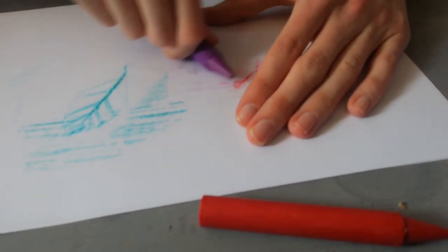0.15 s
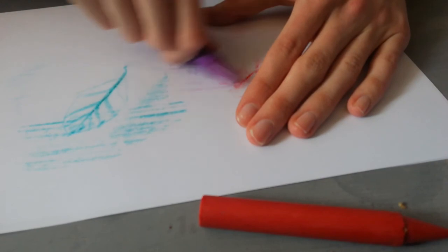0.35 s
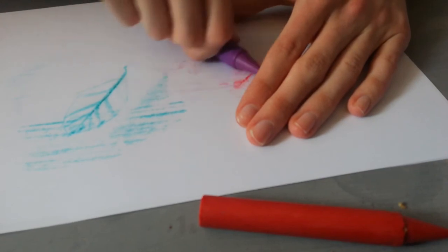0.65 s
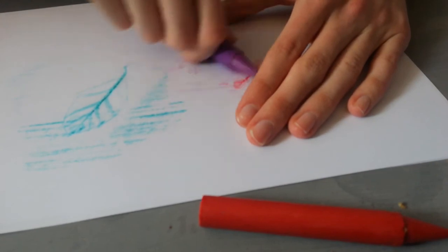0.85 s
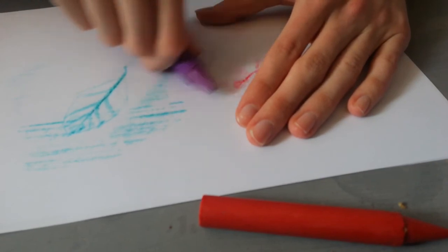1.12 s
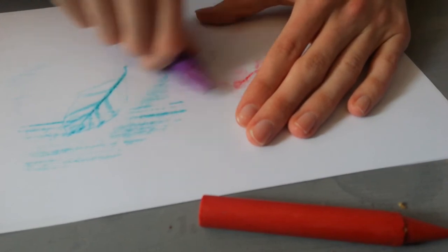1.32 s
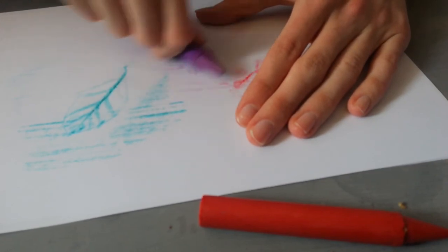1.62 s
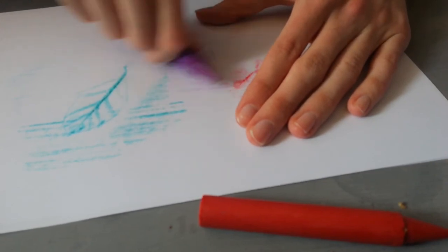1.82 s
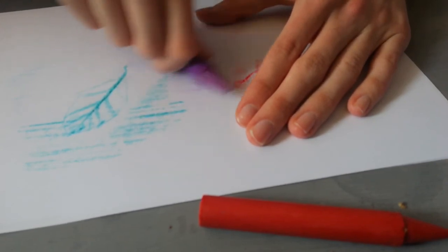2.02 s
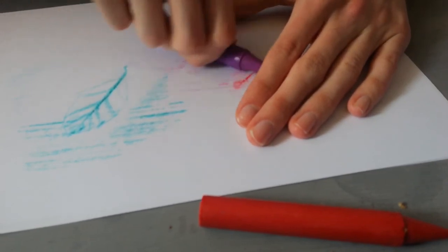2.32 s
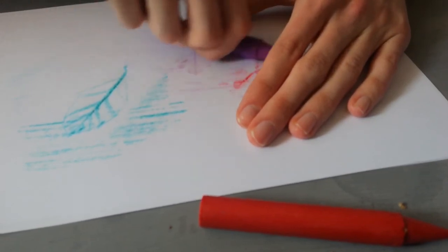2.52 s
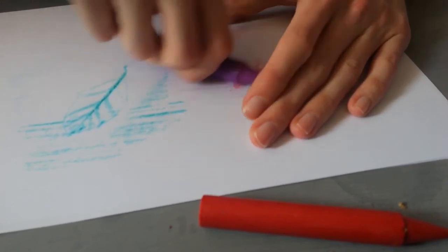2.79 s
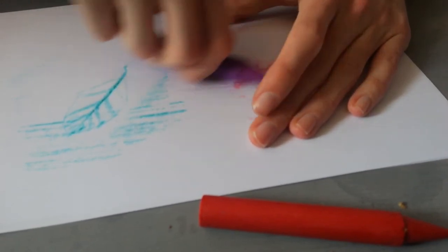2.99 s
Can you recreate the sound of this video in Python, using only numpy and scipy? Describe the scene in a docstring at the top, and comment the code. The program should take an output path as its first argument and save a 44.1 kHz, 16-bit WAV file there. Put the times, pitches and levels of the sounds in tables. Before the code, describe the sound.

Fast crayon rubbing on paper over a table, about ten dry rasping strokes each second

```python
"""Scribbling with a wax crayon

A wax crayon runs back and forth on paper lying on a table, about ten strokes a second, in a small, quiet room.
The hiss is shaped noise made of tiny grains; the rumble is random slips exciting the modes of the table top.
The tip often catches: impulses knock on the same modes and add a short crack of the tip.
Near echoes and a diffuse reverberant tail follow, above a faint noise of still air.
"""
import sys
import numpy as np
from scipy import signal
from scipy.fft import rfft, irfft
from scipy.io import wavfile

SR = 44100
rng = np.random.default_rng(int(sys.argv[2]) if len(sys.argv) > 2 else 0)


def to_wav(s):
    """Save 16-bit WAV."""
    ch = np.atleast_2d(s).T  # columns
    pcm = np.round(np.clip(ch, -1, 1) * 32767)  # PCM
    wavfile.write(sys.argv[1], SR, pcm.astype(np.int16))


N = 138915


def amp(db):
    """Level to amplitude: a gain of 20 dB multiplies amplitude by ten."""
    return 10 ** (np.asarray(db) / 20)


def unit(x):
    """Normalisation by mean power: scale to rms 1."""
    return x / np.sqrt(np.mean(x ** 2) + 1e-20)


def colour(x, spectrum):
    """Spectral shaping: weight a steady noise in frequency, interpolating dB over log f; rms 1."""
    hz, db = np.transpose(spectrum)
    f = np.maximum(np.fft.rfftfreq(N, 1 / SR), 1)
    gain = amp(np.interp(np.log(f), np.log(hz), db))
    return unit(irfft(rfft(x) * gain, N))


def low_pass(x, hz):
    """Second-order low-pass: energy above the corner hz is attenuated."""
    return signal.sosfilt(signal.butter(2, hz, fs=SR, output="sos"), x)


def drift(rate_hz):
    """Band-limited randomness: noise below rate_hz, rms 1."""
    return unit(low_pass(rng.standard_normal(N), rate_hz))


def grains(per_s, spread_db):
    """Shot noise: randomly timed clicks of random sign and uneven size; rms 1."""
    size_db = spread_db * np.minimum(rng.exponential(1, N), 5)
    sizes = amp(size_db) * rng.choice([-1, 1], N)
    return unit(sizes * (rng.random(N) < per_s / SR))


def ring(force, hz, t60):
    """Damped resonance: a two-pole filter whose gain keeps the energy of a click."""
    r = np.exp(-np.log(1000) / (t60 * SR))
    gain = np.sqrt((1 - r * r) / 2)
    poles = [1, -2 * r * np.cos(2 * np.pi * hz / SR), r * r]
    return signal.lfilter([gain, 0, -gain], poles, force + 1e-18)


def clicks(times, db):
    """Impulsive excitation: single-sample clicks at given times and levels."""
    out = np.zeros(N)
    out[np.clip(np.round(times * SR).astype(int), 0, N - 1)] = amp(db)
    return out


# still air of the room, relative power density: (f/Hz, level/dB)
AIR_SPECTRUM = [(20, -12), (40, -5), (52, 4.5), (62, -2), (80, 10.5), (130, -7.5), (300, -13), (1000, -44),
                (4000, -32.5), (15000, -37.5)]
AIR_DB = -51


def still_air():
    """Stationary background noise: random noise with a fixed spectrum."""
    return amp(AIR_DB) * colour(rng.standard_normal(N), AIR_SPECTRUM)


# strokes of the crayon, relative levels:
# (start t/s, end t/s, hiss level/dB, table rumble level/dB, table rasp level/dB)
STROKES = [(-0.02, 0.049, -45, -54, -68), (0.08, 0.16, -44.5, -51.5, -65), (0.195, 0.261, -41.5, -36, -68),
           (0.299, 0.389, -44, -42, -60), (0.421, 0.505, -41.5, -32.5, -50.5),
           (0.531, 0.608, -44, -40, -56), (0.633, 0.716, -42.5, -34, -49), (0.743, 0.841, -45, -38.5, -47),
           (0.859, 0.939, -43, -34, -49.5), (0.968, 1.056, -44, -37, -54.5), (1.074, 1.149, -42, -38, -59),
           (1.18, 1.259, -44, -41, -57.5), (1.276, 1.358, -43, -38, -49.5), (1.385, 1.461, -44, -42, -66),
           (1.486, 1.556, -42.5, -36, -59.5), (1.578, 1.669, -42.5, -44.5, -59),
           (1.694, 1.768, -42, -47.5, -54.5), (1.799, 1.881, -43, -37, -54.5),
           (1.903, 1.984, -45, -33, -57), (2.011, 2.086, -44.5, -36, -62), (2.108, 2.191, -45, -36, -54),
           (2.217, 2.291, -45, -45, -57), (2.323, 2.387, -44, -41, -54.5), (2.413, 2.495, -44, -40.5, -53),
           (2.525, 2.596, -41.5, -39.5, -47), (2.622, 2.696, -43, -45.5, -51),
           (2.726, 2.799, -42.5, -44, -49), (2.823, 2.901, -43.5, -46.5, -52),
           (2.935, 3.022, -43, -44, -51.5), (3.026, 3.118, -45.5, -46, -57),
           (3.119, 3.19, -49.5, -61.5, -69)]
ATTACK_S, RELEASE_S = 0.027, 0.034  # at softness 1


def sweep(levels_db, margin_s, lag_s=0, softness=1):
    """Reversing motion: in each stroke the tip speeds up, slides and stops to turn round."""
    out, t = np.zeros(N), np.arange(N) / SR - lag_s
    for (start, end, *_), db in zip(STROKES, levels_db):
        start, end = start - margin_s, end + margin_s
        span = slice(*np.searchsorted(t, [start, end]))
        rise = np.clip((t[span] - start) / (ATTACK_S * softness), 0, 1)
        fall = np.clip((end - t[span]) / (RELEASE_S * softness), 0, 1)
        out[span] += amp(db) * (np.sin(rise * np.pi / 2) * np.sin(fall * np.pi / 2)) ** 2
    return out


# the tip scratches on a rough spot of the paper: (centre t/s, half length t/s, level/dB)
SCRATCHES = [(0.232, 0.0063, -48), (0.917, 0.00088, -53), (1.309, 0.0052, -45), (2.675, .001, -48)]
# narrow bright band of the friction, relative power density: (f/Hz, level/dB)
SING_SPECTRUM = [(5000, -22), (7000, -11), (8300, -6.5), (9300, 0.5), (10200, 1.5), (11100, -24),
                 (13000, -41), (15800, -28)]
# broad hiss of wax sliding fast on paper, relative power density: (f/Hz, level/dB)
HISS_SPECTRUM = [(1500, -3.5), (3000, -13), (4500, -9.5), (6200, -4.5), (7200, -9), (8500, 8), (10500, 5.5),
                 (12000, 2), (14000, -2.5), (15800, -12)]
SING_DB, SING_MARGIN_S = -4, 0.0089
HISS_DB, HISS_MARGIN_S, HISS_SOFTNESS = -4.5, 0.0068, 1.36
GRAINS_PER_S, GRAIN_SPREAD_DB = 14000, 3
FLUTTER_DB, FLUTTER_HZ = 1.39, 66  # rms and fastest rate at which the hiss flickers


def paper_hiss():
    """Granular friction: wax tears over fibres, a narrow band all through the stroke, a broad one at speed."""
    stroke_db, t = np.array(STROKES)[:, 2], np.arange(N) / SR
    sing_level = sweep(stroke_db + SING_DB, SING_MARGIN_S)
    broad_level = sweep(stroke_db + HISS_DB, HISS_MARGIN_S, softness=HISS_SOFTNESS)
    for centre, half_length, db in SCRATCHES:
        broad_level += amp(db) * np.exp(-((t - centre) / half_length) ** 2)
    sing = sing_level * colour(grains(GRAINS_PER_S, GRAIN_SPREAD_DB), SING_SPECTRUM)
    broad = broad_level * colour(grains(GRAINS_PER_S, GRAIN_SPREAD_DB), HISS_SPECTRUM)
    return (sing + broad) * amp(FLUTTER_DB * drift(FLUTTER_HZ))


# centres of the five bands in which strokes and knocks drive the table: f/Hz
BANDS_HZ = [250, 700, 1150, 1800, 3000]


def band_shares(hz):
    """Interpolation over log frequency: how much each of the five bands counts at hz."""
    return np.array([np.interp(np.log(hz), np.log(BANDS_HZ), row) for row in np.eye(len(BANDS_HZ))])


# gain of the rasp in each of the four upper bands: level/dB
RASP_DB = [-1, 2.5, -12.5, -3]
RUMBLE_DB = -1.5  # gain of the rumble, in the lowest band
RUB_MARGIN_S, RUB_LAG_S, RUB_SOFTNESS = 0.011, 0.002, 1.59
SLIPS_PER_S, SLIP_SPREAD_DB = 900, 6.5
PRESSURE_DB, PRESSURE_HZ = 1, 21.8  # the hand presses unevenly: rms and fastest rate


def table_rub():
    """Stick-slip excitation: small random slips under each stroke push every mode of the table."""
    rumble, rasp = np.array(STROKES)[:, 3:].T
    rub_db = np.array([rumble + RUMBLE_DB] + [rasp + db for db in RASP_DB])
    pressure = amp(PRESSURE_DB * drift(PRESSURE_HZ))
    forces = []
    for hz, *_ in TABLE_MODES:
        stroke = sweep(band_shares(hz) @ rub_db, RUB_MARGIN_S, RUB_LAG_S, RUB_SOFTNESS)
        forces.append(stroke * pressure * grains(SLIPS_PER_S, SLIP_SPREAD_DB))
    return np.array(forces)


# knocks of the tip: (t/s, then relative level/dB in each of the five bands)
KNOCKS = [(0.03, -38, -41.5, -49, -87, -72), (0.2412, -33, -40.5, -32.5, -40.5, -52.5),
          (0.3476, -30, -45, -34.5, -65, -50), (0.363, -24, -34.5, -26, -27.5, -33.5),
          (0.4384, -20.5, -50, -35, -48, -52), (0.4565, -47, -36, -36.5, -55, -62),
          (0.4858, -26.5, -33, -29.5, -31, -45.5), (0.563, -30.5, -35, -27, -36, -38),
          (0.574, -32, -36, -40, -40, -46), (0.5964, -38, -34, -37.5, -29, -51),
          (0.6643, -28, -30, -31, -42, -44), (0.6846, -19.5, -35, -26.5, -13.5, -33),
          (0.6879, -32, -30.5, -19.5, -19, -21.5), (0.7715, -31, -27.5, -27.5, -33, -32),
          (0.791, -38, -35, -25, -38, -35), (0.7987, -23.5, -42, -27, -31, -30),
          (0.8714, -33, -39, -34, -49, -66), (0.8945, -31, -45, -30, -49, -65),
          (0.9192, -27, -33, -19.5, -15.5, -21.5), (1.0467, -36, -42, -39.5, -39.5, -54),
          (1.1336, -39, -38, -31.5, -47, -45.5), (1.238, -23.5, -37.5, -36, -21, -24.5),
          (1.3058, -27, -52, -43, -28.5, -50), (1.3303, -37.5, -31, -22.5, -36, -31.5),
          (1.4001, -56, -34.5, -36, -48, -49), (1.5311, -36, -30, -24, -31, -31.5),
          (1.605, -46, -43, -46.5, -56, -46), (1.741, -37.5, -35.5, -30, -46, -45),
          (1.8143, -42, -44, -41, -43, -67), (1.867, -20.5, -35, -29.5, -21, -19.5),
          (1.968, -47, -31, -29.5, -38, -44), (2.048, -25, -31, -23.5, -31.5, -35.5),
          (2.0707, -41, -40, -33.5, -28.5, -51), (2.1467, -37, -34.5, -29.5, -40, -40),
          (2.1795, -41, -44, -43.5, -65, -66), (2.254, -31.5, -35.5, -23.5, -35, -32),
          (2.4332, -38, -38, -30.5, -52, -50), (2.445, -33, -36, -26, -40, -38.5),
          (2.4748, -31, -33.5, -21, -27.5, -36), (2.6772, -34.5, -28.5, -28, -26, -40),
          (2.8844, -32, -28.5, -28.5, -26, -44), (3.0794, -33.5, -47, -36, -57, -66)]
KNOCK_DB, THUMP_DB = 23, 23.5  # gains above and within the lowest band
THUMP_LOW_HZ, THUMP_FALL_DB = 190, -4  # below this pitch a knock weakens, per octave
THUMP_LEAD_S = 0.001997  # the lowest band comes this much earlier
CHATTER_DB = -12.5  # level of the repeated touches
SPOT_SCATTER_DB = 1.8  # rms: every spot rings the modes differently


def tip_knocks():
    """Impact excitation: a knock drives all modes by its band levels; the tip then touches again three times."""
    times, *knock_db = np.transpose(KNOCKS)
    again = times[:, None] + rng.uniform(0.00149, 0.011, size=(len(times), 3))
    spread = np.sqrt(3)  # gives the uniform scatter rms 1
    spot_db = SPOT_SCATTER_DB * rng.uniform(-spread, spread, (len(times), len(TABLE_MODES)))
    forces = []
    for k, (hz, *_) in enumerate(TABLE_MODES):
        share = band_shares(hz)
        bass = share[0]
        thump_db = THUMP_DB + THUMP_FALL_DB * max(np.log2(THUMP_LOW_HZ / hz), 0)
        gain_db = bass * thump_db + (1 - bass) * KNOCK_DB
        hit_db = share @ np.array(knock_db) + gain_db + spot_db[:, k]
        first = clicks(times - THUMP_LEAD_S * bass ** 4, hit_db)
        chatter = sum(clicks(s, hit_db + CHATTER_DB) for s in again.T)
        forces.append(first + (1 - bass) * chatter)  # no chatter in the deep bass
    return np.array(forces)


# modes of the table top; t60 is the time to decay by 60 dB: (f/Hz, relative level/dB, t60 t/s)
TABLE_MODES = [(82.9, -6, 0.46), (129.6, -8.5, 0.032), (152.5, -10.5, 0.076), (208.7, -5.5, 0.035),
               (258.5, -2, .09), (351.4, -7.5, 0.065), (517, -14, 0.13), (624, -6.5, 0.035),
               (706.3, -6, 0.05), (806.3, -2.5, 0.038), (1061, 0, 0.026), (1190, -0.5, 0.028),
               (1383, -10, 0.078), (1472, -4, 0.051), (1651, -5, 0.019), (1910, -12.5, 0.038),
               (2150, -5, 0.014), (2470, -11.5, 0.0067), (2484, -9.5, 0.035), (2868, -13, 0.018),
               (3100, -10.5, 0.0067), (3324, -18.5, 0.048), (3810, -15.5, 0.0054), (4080, -25.5, 0.008),
               (4560, -45, 0.016)]
SOFT_CONTACT = 1.6  # wax is soft: it pushes a mode only up to this multiple of its pitch


def table_top():
    """Modal superposition: slips and knocks ring the same damped modes, summed with alternating sign."""
    forces = table_rub() + tip_knocks()
    out = np.zeros(N)
    for k, (hz, db, t60) in enumerate(TABLE_MODES):
        corner = SOFT_CONTACT * hz
        soft_force = low_pass(low_pass(forces[k] + 1e-18, corner), corner)
        out += (-1) ** k * amp(db) * ring(soft_force, hz, t60)
    return out


CRACK_HZ, CRACK_T60_S, CRACK_TOP_HZ = 2430, 0.00062, 4350
CRACK_DB = 25
CRACK_FULL_DB, CRACK_GROWTH = -17, 0.5  # below this treble level the crack loses extra dB per dB


def tip_crack():
    """Heavily damped resonance: a short crack of the tip, fading faster than the knock as knocks soften."""
    times, *_, treble_db = np.transpose(KNOCKS)
    db = treble_db + CRACK_DB + CRACK_GROWTH * np.minimum(treble_db - CRACK_FULL_DB, 0)
    crack = ring(clicks(times, db), CRACK_HZ, CRACK_T60_S)
    return -low_pass(low_pass(crack, CRACK_TOP_HZ), CRACK_TOP_HZ)  # the tip pushes the table away first


# nearby surfaces: (delay t/s, level/dB)
ECHOES = [(.0016, -16), (.0075, -23.5)]


def near_echoes(direct):
    """Discrete reflection: each nearby surface returns a delayed, weaker copy."""
    n = np.arange(N)
    return sum(amp(db) * np.interp(n - s * SR, n, direct, left=0) for s, db in ECHOES)


ROOM_LOW_CUT_HZ, ROOM_BUILD_S = 480, 0.0017


def room(x, t60, wet_db):
    """Diffuse reverberation: convolve with exponentially decaying noise, thin in the bass."""
    t = np.arange(SR // 2) / SR
    decay = np.exp(-np.log(1000) * t / t60)
    build = np.minimum(t / ROOM_BUILD_S, 1) ** 2
    tail = rng.standard_normal(len(t)) * decay * build
    low_cut = signal.butter(1, ROOM_LOW_CUT_HZ, "high", fs=SR, output="sos")
    tail = signal.sosfilt(low_cut, tail / np.linalg.norm(tail))
    return x + amp(wet_db) * signal.fftconvolve(x, tail)[:N]


def scene():
    """Linear superposition: air, hiss and table with near echoes add up in the room."""
    air = still_air()
    hiss = room(paper_hiss(), t60=0.21, wet_db=-17.5)
    direct = table_top() + tip_crack()
    wood = room(direct + near_echoes(direct), t60=0.25, wet_db=-11.5)
    return (wood + hiss + air)[None]


def record(dry):
    """Band limitation: a steep elliptic low-pass cuts the top at 15.8 kHz."""
    return signal.sosfilt(signal.ellip(12, 0.1, 80, 15800, fs=SR, output="sos"), dry)


dry = scene()
out = record(dry)
to_wav(out)
```